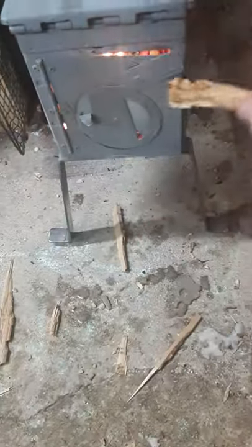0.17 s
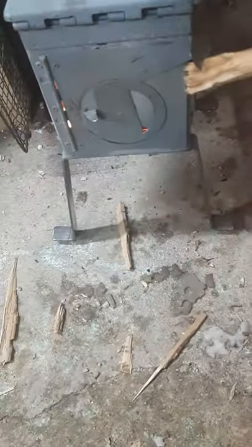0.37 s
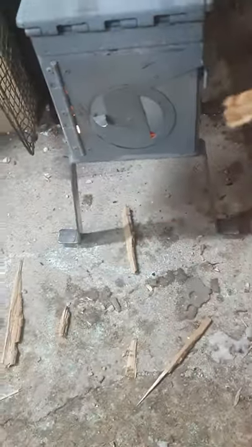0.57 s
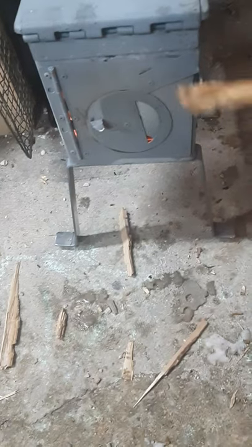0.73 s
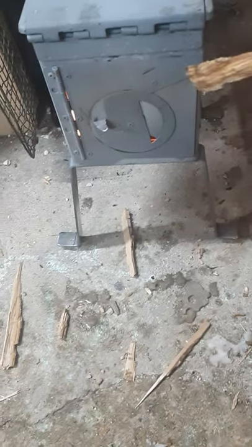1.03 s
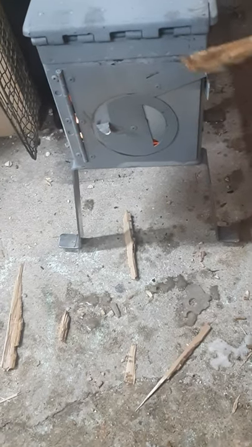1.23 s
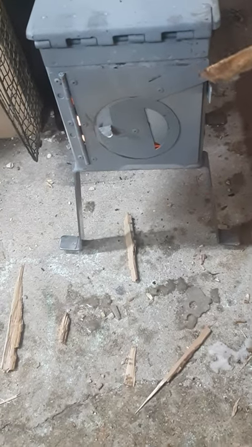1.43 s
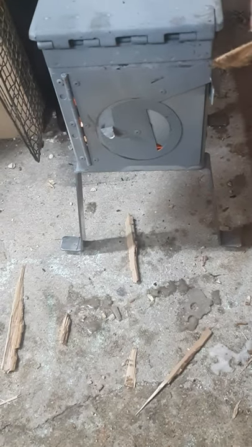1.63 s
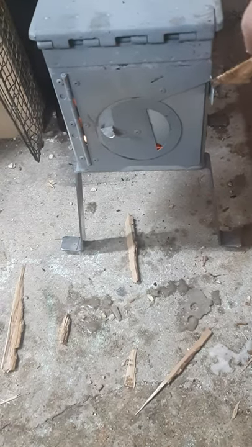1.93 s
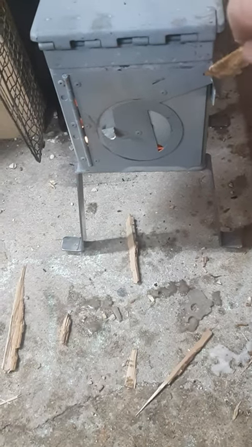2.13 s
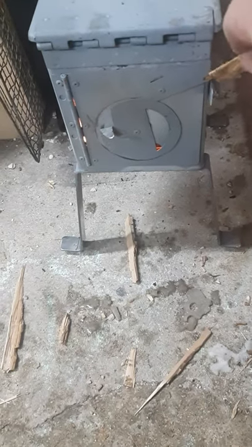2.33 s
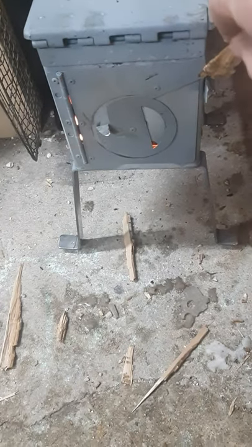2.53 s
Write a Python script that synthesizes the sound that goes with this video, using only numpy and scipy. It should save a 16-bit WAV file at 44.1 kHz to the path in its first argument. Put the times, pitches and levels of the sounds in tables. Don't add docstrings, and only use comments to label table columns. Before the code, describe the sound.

Thin sheet-metal stove door closes with a brief squeak and sharp clank, knocks again, then a stick quietly taps and scratches its edge while the box thuds softly; sparse wood crackles, small reverberant room, close stereo phone.

```python
import sys
import numpy as np
from scipy import signal
from scipy.fft import rfft, irfft
from scipy.io import wavfile
from scipy.ndimage import uniform_filter1d, map_coordinates

SR = 44100
rng = np.random.default_rng(int(sys.argv[2]) if len(sys.argv) > 2 else 0)


def wav_record(signal):
    frames = np.transpose(np.atleast_2d(signal))
    bounded = np.clip(frames, -1, 1)
    quanta = np.round(bounded * 32767).astype(np.int16)
    wavfile.write(sys.argv[1], SR, quanta)


def decibels_to_gain(level_db):
    exponent = np.asarray(level_db, float) / 20
    return 10 ** exponent


N = 119070


def seconds():
    return np.arange(N) / SR


def unit(x):
    return x / np.sqrt(np.mean(x ** 2) + 1e-30)


def curve(table, col):
    table = np.array(table)
    return np.interp(seconds(), table[:, 0], table[:, col])


def swell(start, length):
    return np.sin(np.pi * np.clip((seconds() - start) / length, 0, 1) ** 0.72)


def walk(rate):
    k = int(SR / rate)
    noise = rng.standard_normal(N)
    return unit(uniform_filter1d(uniform_filter1d(noise, k), k))


def clicks(rate, scatter_db):
    chance, size, sign = rng.random(N), rng.exponential(size=N), np.sign(rng.standard_normal(N))
    return unit((chance < rate / SR) * decibels_to_gain(scatter_db * np.minimum(size, 2)) * sign)


def colour(x, points, share=1):
    hz, db = np.array(points, float).T
    f = np.arange(1025) * SR / 2048 + 1
    gain_db = share * np.interp(np.log(f), np.log(np.maximum(hz, 1)), db)
    cepstrum = irfft(np.log(decibels_to_gain(gain_db)))
    cepstrum[1:1024] *= 2
    cepstrum[1025:] = 0
    h = irfft(np.exp(rfft(cepstrum)))
    if share == 1:
        h = h / np.sqrt(np.sum(h ** 2))
    return signal.fftconvolve(x, h)[:N]


def ring(x, modes):
    out = 0
    for hz, db, fade_s in modes:
        pole = np.exp(2j * np.pi * hz / SR - np.log(1000) / (fade_s * SR))
        out = out + decibels_to_gain(db) * signal.lfilter([1], [1, -pole], x).imag
    return out


# start_s, crack_db, wood_tick_db, boom_db, rattle_s
BLOWS = [(0.033, -64, -54.5, -92, 0.097), (0.267, -49, -41, -34, 0.014), (0.299, -31.5, -32, -24.5, 0.018),
         (0.422, -53.5, -52, -62, 0.029), (0.513, -55.5, -55, -31, 0.0063), (0.606, -67, -73, -51.5, 0.016),
         (0.66, -75.5, -69, -67, 0.062), (0.866, -43.5, -44, -42.5, 0.029), (1.082, -92, -71, -38, 0.028),
         (1.159, -70, -69.5, -52, 0.063), (1.531, -64.5, -61, -68, 0.023),
         (1.624, -58.5, -64, -43.5, 0.024), (1.859, -62.5, -55.5, -50, 0.03),
         (1.893, -54.5, -54.5, -51, 0.038), (2.173, -73, -75, -58, 0.018), (2.224, -69, -64, -64, .02),
         (2.25, -52.5, -72, -64, 0.014), (2.277, -47, -51, -50, 0.035), (2.323, -47.5, -47.5, -59, 0.035),
         (2.398, -61, -82, -45.5, 0.021), (2.489, -50, -56, -53.5, 0.028), (2.531, -51, -57.5, -59, 0.023),
         (2.597, -57.5, -57, -65, 0.029)]


def blows():
    t = seconds()
    panel, wood, leaf = np.zeros((3, N))
    rattle, fibres = clicks(4000, 3.7), rng.standard_normal(N)
    snap_db, wood_snap_db = 39, 35.5
    rise_share, push_s, sharp_s = 0.018, 0.00011, 0.005
    for start, crack_db, tick_db, boom_db, length in BLOWS:
        age = np.maximum(t - start, 0)
        fade = np.exp(-age / length) * (1 - np.exp(-age / (rise_share * length)))
        panel += decibels_to_gain(crack_db) * fade * rattle
        wood += decibels_to_gain(tick_db) * fade * fibres
        first, sharp = int(start * SR), min(sharp_s / length, 1)
        panel[first] += decibels_to_gain(crack_db + snap_db) * sharp
        wood[first] += decibels_to_gain(tick_db + wood_snap_db) * sharp
        push = age * np.exp(-age / push_s) / push_s
        leaf += decibels_to_gain(boom_db) * (0.053 * push + 0.042 * fade * rattle)
    return np.array([panel, wood, leaf])


# start_s, length_s, level_db, fibre_hiss_db, boom_db
SCRAPES = [(-.06, 0.11, -54.5, -55.5, -45), (0.13, 0.1, -37, -43, -52), (0.357, 0.09, -63.5, -65, -50.5),
           (0.432, 0.078, -68.5, -69, -46), (0.48, 0.051, -61, -59, -39.5), (0.542, 0.067, -63, -65.5, -49),
           (1.053, 0.11, -59.5, -65.5, -59), (1.257, 0.3, -72, -91, -73),
           (1.541, 0.069, -56.5, -56.5, -52.5), (1.734, 0.074, -72, -76, -68.5),
           (2.013, 0.068, -64, -55.5, -59), (2.105, 0.14, -68.5, -67.5, -65),
           (2.219, 0.088, -58, -83, -47.5), (2.254, 0.044, -51, -72, -66), (2.357, 0.073, -54, -92, -66),
           (2.524, 0.04, -59, -76, -58.5)]


def scrapes():
    panel, wood, leaf = np.zeros((3, N))
    fibres, grit = rng.standard_normal(N), clicks(2800, 3)
    stutter = decibels_to_gain(4 * walk(69))
    for start, length, db, hiss_db, boom_db in SCRAPES:
        on = swell(start, length) * stutter
        panel += decibels_to_gain(db) * on * grit
        wood += decibels_to_gain(hiss_db) * on * fibres
        leaf += decibels_to_gain(boom_db - 26.5) * on * grit
    return np.array([panel, wood, leaf])


# pitch_hz, level_db
CRACK = [(400, -33), (800, -1), (1500, -5.5), (2200, 0), (4900, -1), (6800, -8), (7800, -27),
         (16000, -24.5)]
# pitch_hz, width_hz, level_db
PANEL = [(4637, 130, 13), (5950, 54, -66), (6300, 24, -47)]


def metal(force):
    rings = [(hz, db, 0.24 / width) for hz, width, db in PANEL]
    one_tap = np.arange(9000) == 0
    gain = np.sqrt(np.sum(ring(one_tap, rings) ** 2))
    return colour(force, CRACK) + decibels_to_gain(-21) * ring(force, rings) / gain


# pitch_hz, level_db, fade_60db_s
LEAF = [(172, -25, 0.3), (251.4, -1.5, 0.21), (360, -18, 0.21), (397, -5, 0.11), (486, -2, 0.099),
        (540.5, -8, 0.041), (594, -2, 0.012), (743, -14.5, 0.086), (855, -4.5, 0.031), (1068, -15, 0.053),
        (1548, -21.5, 0.068)]


def door_leaf(force):
    return ring(force, LEAF)


# pitch_hz, level_db
TICK = [(1500, -80), (2800, -20), (4500, -1), (7500, -12.5), (10000, -10.5), (13000, -14), (15300, -10.5),
        (16500, -10.5)]


def stick(force):
    return colour(force, TICK)


# start_s, peak_db
KNOCKS = [
    (0.274, -34.5),
    (0.513, -32),
    (0.87, -44.5),
    (1.074, -38),
    (1.912, -38.5),
]


def knocks():
    pitch_hz, fade_60db_s, rise_s = 473, 0.086, 0.001
    out = 0
    for start, db in KNOCKS:
        age = np.maximum(seconds() - start, 0)
        fade = decibels_to_gain(db - 60 * age / fade_60db_s) * (1 - np.exp(-age / rise_s))
        out = out + fade * np.sin(2 * np.pi * pitch_hz * age)
    return out


# start_s, length_s, slip_hz, sag_hz, level_db
SQUEAKS = [
    (0.136, .027, 930, 62, -33.5),
    (0.155, .041, 866, 14, -27.5),
    (0.197, .027, 850, 18, -38),
    (0.229, .028, 890, 2, -42),
    (0.266, .02, 915, 0, -44),
]
# multiple, level_db
SQUEAK_ORDERS = [(1, 0), (2, -11), (3, -22), (4, -21)]


def squeak():
    t, out, wobble = seconds(), 0, 1 + 0.004 * walk(250)
    for start, length, hz, sag_hz, db in SQUEAKS:
        slip_hz = hz - sag_hz * np.clip((t - start) / length, 0, 1)
        phase = 2 * np.pi * np.cumsum(slip_hz * wobble) / SR
        tone = sum(decibels_to_gain(g) * np.sin(k * phase) for k, g in SQUEAK_ORDERS)
        out = out + decibels_to_gain(db) * swell(start, length) * tone
    return np.sqrt(2) * decibels_to_gain(1) * out


# start_s, length_s, pitch_hz, level_db
SINGS = [(0.175, .04, 281, -37), (0.175, .03, 581, -45), (0.172, .045, 1092, -42), (0.225, .032, 1095, -45),
         (0.18, .045, 1990, -44), (0.21, .04, 270, -42), (0.275, .025, 262, -38), (0.294, .018, 1095, -38),
         (0.137, .03, 1825, -43), (0.606, .03, 900, -52), (0.183, .04, 1697, -38),
         (0.293, .036, 255, -27.5)]


def singing():
    t, wobble_s = seconds(), np.cumsum(0.004 * walk(240)) / SR
    out = 0
    for start, length, hz, db in SINGS:
        tone = np.sin(2 * np.pi * hz * (t - start + wobble_s))
        out = out + np.sqrt(2) * decibels_to_gain(db) * swell(start, length) * tone
    return out


# start_s, length_s, level_db
DRAGS = [
    (0, 0.088, -58.5),
    (0.204, 0.12, -47.5),
    (0.394, 0.025, -53),
    (0.459, 0.027, -48.5),
    (0.483, 0.058, -44.5),
    (2.014, 0.085, -73.5),
    (2.404, 0.043, -65),
    (2.545, 0.063, -69),
    (1.722, 0.12, -70.5),
]
# pitch_hz, level_db
DULL = [(400, -11.5), (900, -4.5), (1800, 4.5), (3000, 0), (5000, -3.5), (6800, -19.5), (7800, -29),
        (16000, -8)]


def drags():
    on = sum(decibels_to_gain(db) * swell(start, length) for start, length, db in DRAGS)
    grit = clicks(2500, 4.5)
    stutter = decibels_to_gain(2.5 * walk(66))
    return colour(on * grit * stutter, DULL)


# start_s, peak_db, pitch_hz
NUDGES = [(0.212, -25, 172), (0.411, -23, 250), (0.473, -42, 246), (0.602, -23, 135), (0.625, -51, 140),
          (0.717, -29.5, 130.3), (0.878, -28.5, 238), (0.961, -33.5, 256), (1.08, -30, 224),
          (1.096, -31, 240), (1.165, -29, 246), (1.42, -34, 197), (1.213, -26, 175), (1.237, -26, 230),
          (1.399, -27, 223), (1.448, -24.5, 234), (1.562, -31.5, 239), (1.601, -44, 158), (1.675, -24, 167),
          (1.721, -36, 249), (1.845, -23, 244), (1.915, -26.5, 234), (2.044, -20.5, 163.6),
          (2.061, -41, 183), (2.135, -22, 172), (2.205, -26, 134.5), (2.406, -25, 169), (2.424, -30, 169),
          (2.442, -31.5, 164), (2.581, -43, 176)]


def nudges():
    t, booms = seconds(), 0
    rise_turns, fall_turns = 0.66, 1.64
    for start, db, hz in NUDGES:
        turns = np.maximum(t - start, 0) * hz
        shape = (1 - np.exp(-turns / rise_turns)) * np.exp(-turns / fall_turns)
        booms = booms + decibels_to_gain(db - 3.5) * shape * np.sin(2 * np.pi * turns)
    return booms


# time_s, level_db
RUB = [
    (0, -48),
    (.2, -50),
    (.62, -44.5),
    (.7, -53.5),
    (1.2, -50),
    (1.45, -44.5),
    (2.25, -48.5),
    (2.45, -63),
    (2.7, -70),
]
# pitch_hz, level_db, fade_60db_s
BOX = [(133, -14, 0.17), (173, 9.5, 0.15), (243, 4.5, 0.17), (261.2, 5.5, 0.074), (277, -33, 0.017),
       (430, -7.5, 0.074), (452.5, -9.5, 0.14), (560, -13, 0.059), (668, -15.5, 0.053), (772, -6, 0.036),
       (910, -7.5, 0.058), (1100, -52, 0.047)]


def rubbing():
    soft = signal.lfilter(*signal.butter(1, 520, fs=SR), clicks(500, 2))
    pressure = decibels_to_gain(curve(RUB, 1) + 2.5 * walk(14))
    return pressure * unit(ring(soft, BOX))


# start_s, peak_db, lowest_hz
CRACKLES = [(0.4265, -38, 9000), (0.4935, -41, 2000), (0.508, -44, 7000), (0.512, -42, 6000),
            (0.67, -52, 3500), (0.836, -45, 3500), (1.042, -48, 11000), (1.195, -50, 11000),
            (1.246, -50, 10000), (1.3224, -44, 3000), (1.5335, -38, 9000), (1.7433, -52, 6000),
            (1.8555, -44, 9000), (1.985, -46, 10000), (2.0124, -25, 2500), (2.0278, -38, 7000),
            (2.1295, -44, 5000), (2.292, -38, 11000), (2.6055, -37, 11000)]
# pitch_hz, level_db
POP = [(1500, -75), (2800, -18), (4700, -6.5), (6500, -19), (8000, -6), (11000, -21), (14000, -7.5),
       (16500, -7)]


def fire():
    x = np.zeros(N + 256)
    one_tap = np.arange(256) == 0
    for start, db, hz in CRACKLES:
        snap = signal.lfilter(*signal.butter(4, hz, "high", fs=SR), one_tap)
        first = int(start * SR)
        x[first:first + 256] += decibels_to_gain(db + 14.5) * snap
    return colour(x[:N], POP)


# pitch_hz, level_db
AIR = [(12, -79), (20, -26.5), (126, -5), (239, -6), (373, -22.5), (551, -28.5), (633, -39), (15600, -48.5)]
# pitch_hz, width_hz, level_db
PORT_RING = (4920, 170, -23)


def air():
    hz, width, db = PORT_RING
    port = signal.butter(1, [hz - width / 2, hz + width / 2], "band", fs=SR)
    layers = []
    for noise in rng.standard_normal((2, N)):
        whistle = decibels_to_gain(db + 2.8 * walk(8.9)) * unit(signal.lfilter(*port, noise))
        layers.append((colour(noise, AIR) + whistle) * decibels_to_gain(0.18 * walk(36)))
    mid, side = layers
    side = signal.lfilter(*signal.butter(1, 600, "high", fs=SR), side)
    return decibels_to_gain(-56.5) * np.array([mid + side, mid - side])


def ports(x, pan_db, wet_db):
    fade_60db_s, treble_fade_60db_s, gap_s = 0.22, 0.11, 0.0025
    room_hz, lag_s = 640, 0.00018
    age = np.arange(SR // 2) / SR
    noise = rng.standard_normal((2, SR // 2))
    low = signal.lfilter(*signal.butter(2, 2800, fs=SR), noise)
    tail = low * decibels_to_gain(-60 * age / fade_60db_s) + (noise - low) * decibels_to_gain(-60 * age / treble_fade_60db_s)
    tail = tail * (age > gap_s)
    tail = tail / np.sqrt(np.sum(tail[0] ** 2))
    tail = signal.sosfilt(signal.butter(2, room_hz, "high", fs=SR, output="sos"), tail)
    near = x - 0.4 * signal.lfilter(*signal.butter(1, room_hz, "high", fs=SR), x)
    late = map_coordinates(near, [(seconds() - lag_s) * SR], mode="nearest")
    wet = signal.fftconvolve(x[None], tail, axes=1)[:, :N]
    return np.array([near * decibels_to_gain(pan_db / 2), late * decibels_to_gain(-pan_db / 2)]) + decibels_to_gain(wet_db) * wet


def scene():
    panel, wood, leaf = blows() + scrapes()
    stove = metal(panel) + door_leaf(leaf) + nudges() + rubbing() + knocks() + drags()
    stove = signal.sosfilt(signal.butter(3, 82, "high", fs=SR, output="sos"), stove)
    mix = ports(stove, -0.018, -0.5)
    mix = mix + ports(squeak() + singing(), -0.5, -10)
    mix = mix + ports(stick(wood), 0.71, -3.5)
    mix = mix + ports(fire(), 3.3, -6)
    return mix + air()


def roll_off(x):
    return signal.sosfilt(signal.butter(12, 16850, fs=SR, output="sos"), x)


# pitch_hz, left_over_right_db
PORT_DB = [(150, -1), (300, -3.5), (800, 5), (1500, 2), (4000, 2), (9000, -3.5), (15000, 9.5)]


def record(dry):
    x = np.array([colour(dry[0], PORT_DB, 0.61), colour(dry[1], PORT_DB, -0.23)])
    x = signal.sosfilt(signal.ellip(6, 0.3, 22, 15700, fs=SR, output="sos"), x)
    x = signal.sosfilt(signal.ellip(8, 0.3, 60, 16650, fs=SR, output="sos"), x)
    return roll_off(x)


dry = scene()
out = record(dry)
wav_record(out)
```